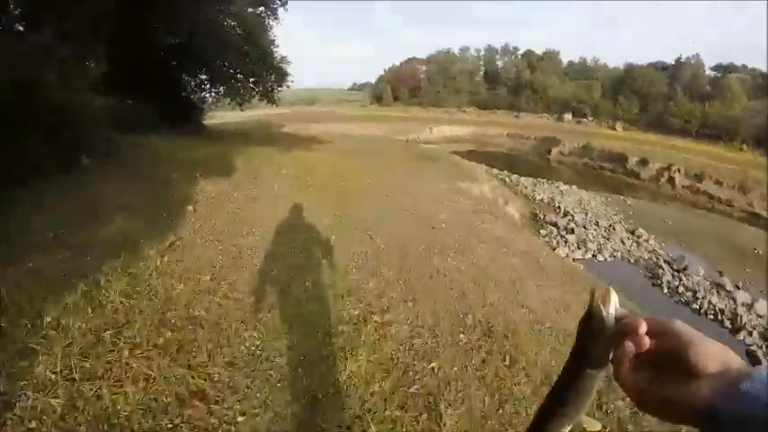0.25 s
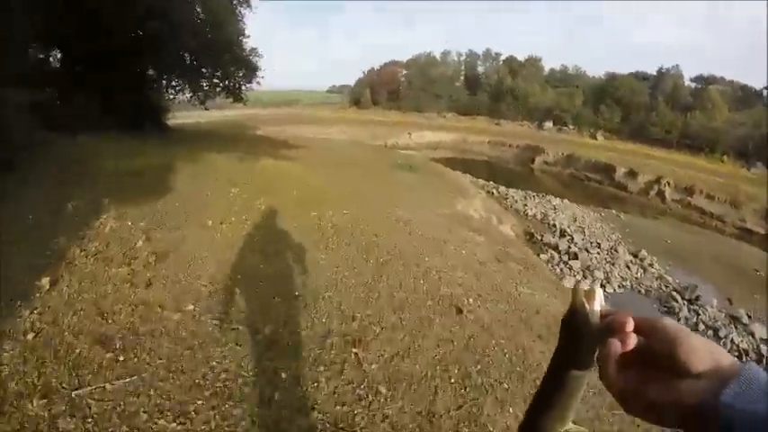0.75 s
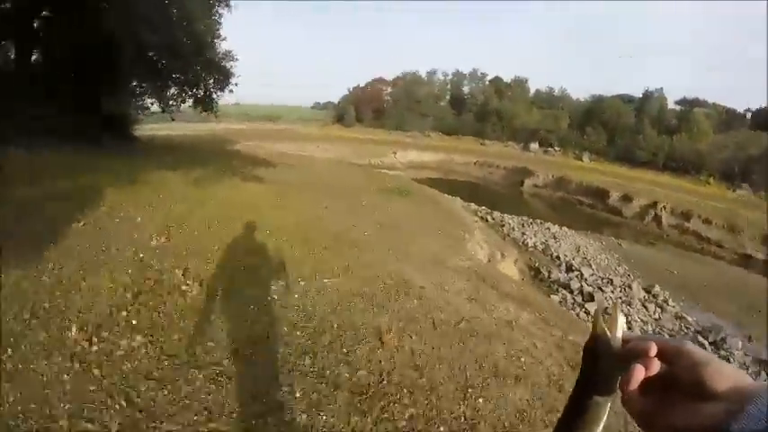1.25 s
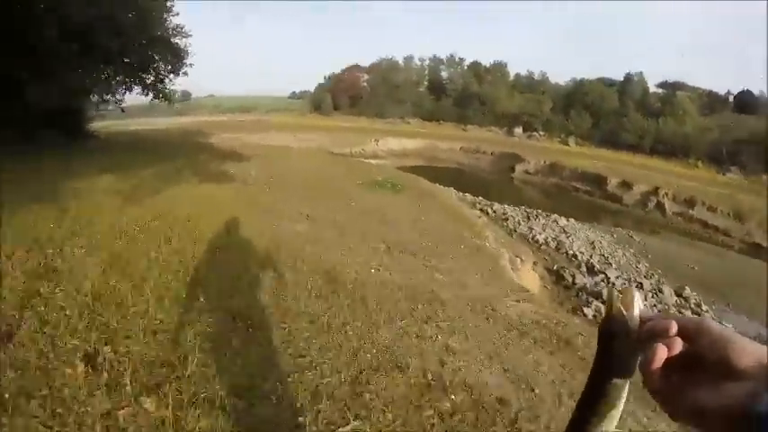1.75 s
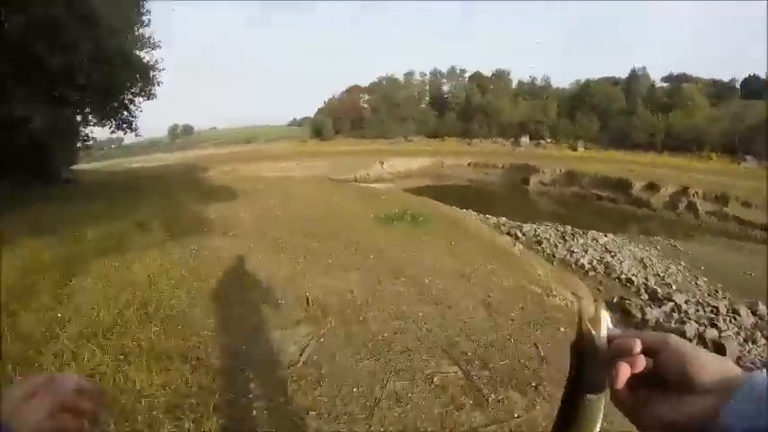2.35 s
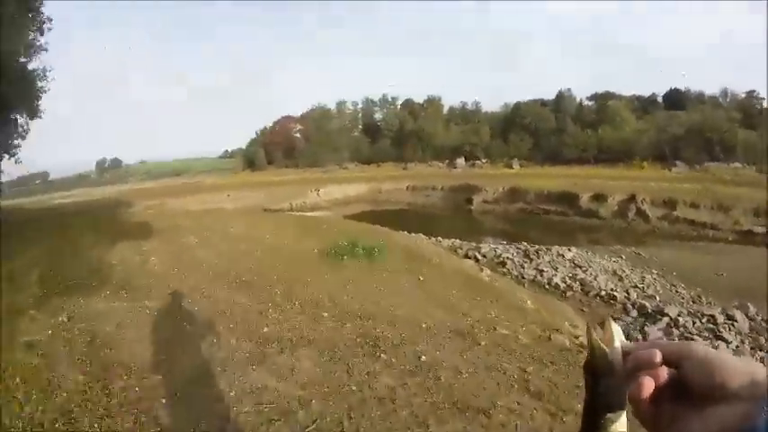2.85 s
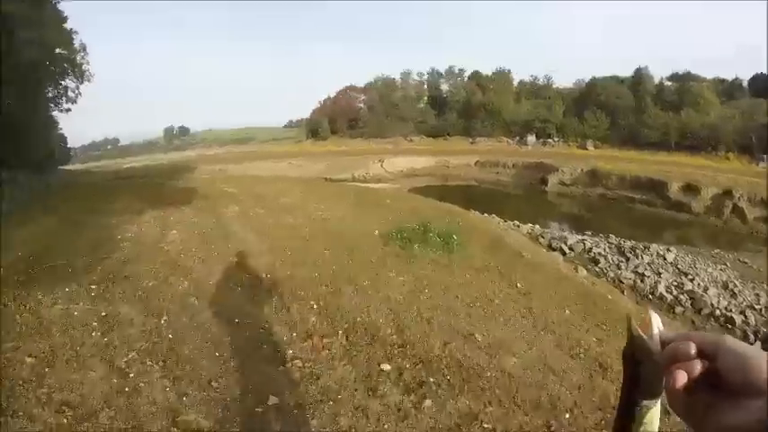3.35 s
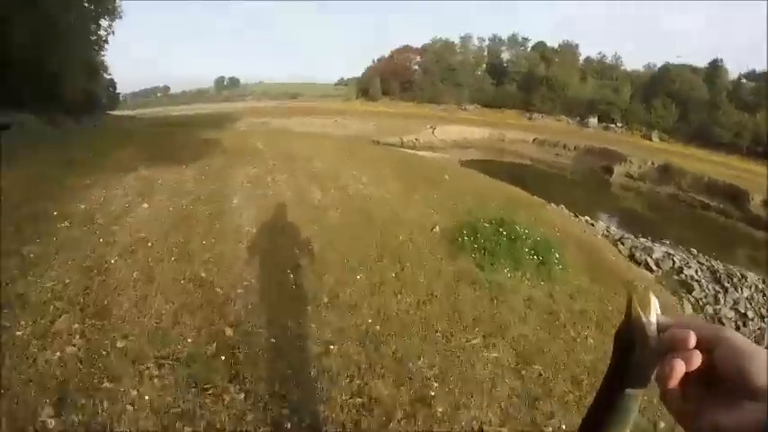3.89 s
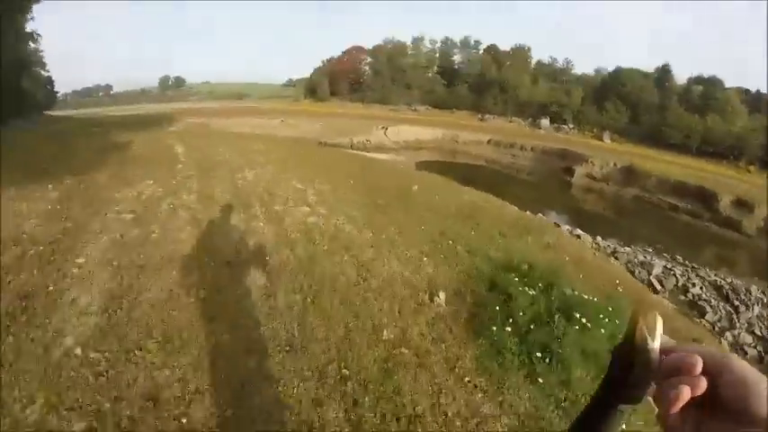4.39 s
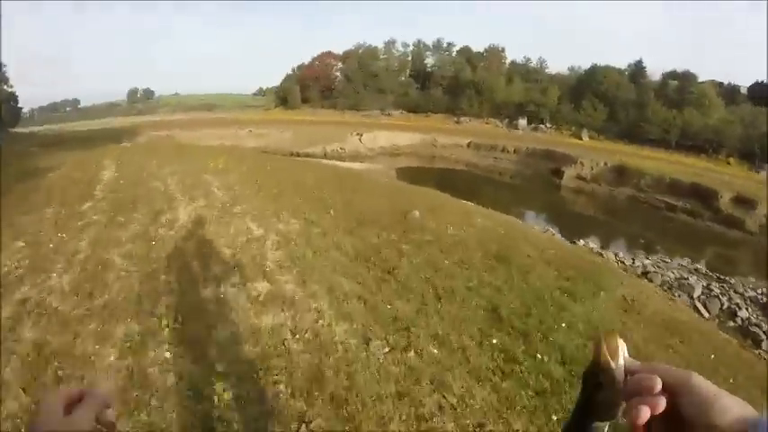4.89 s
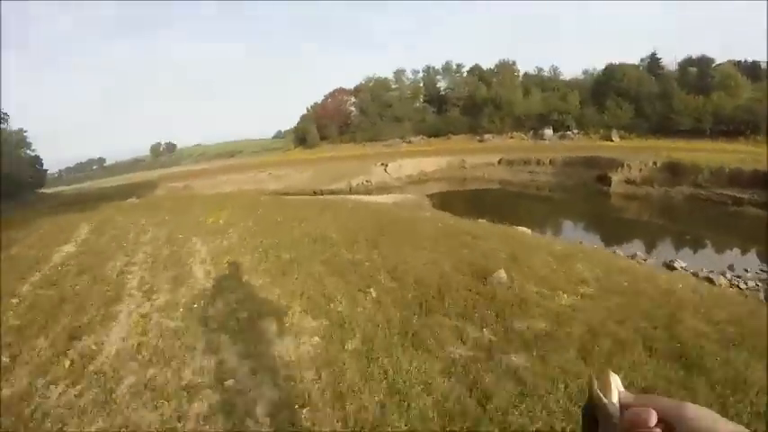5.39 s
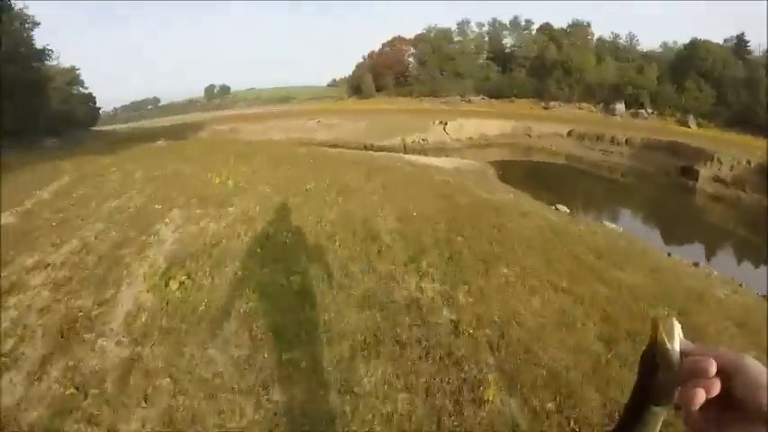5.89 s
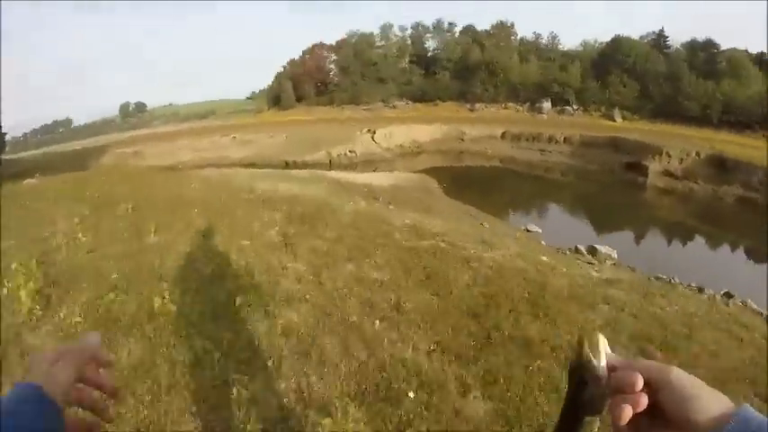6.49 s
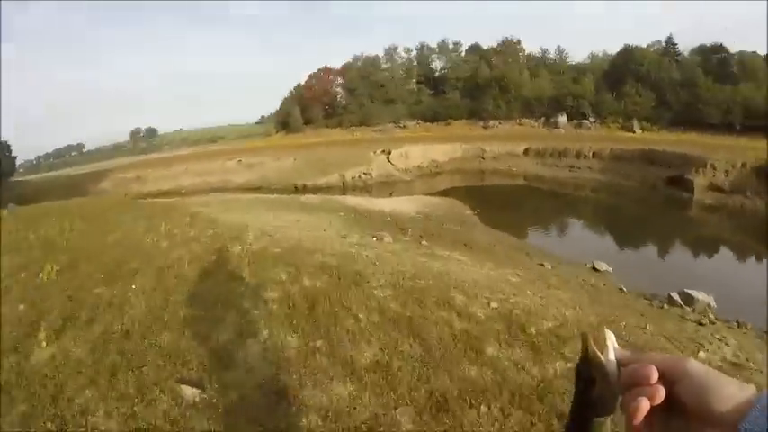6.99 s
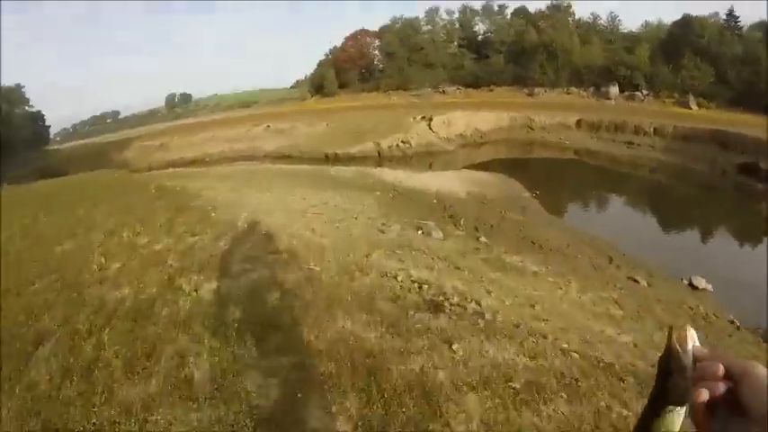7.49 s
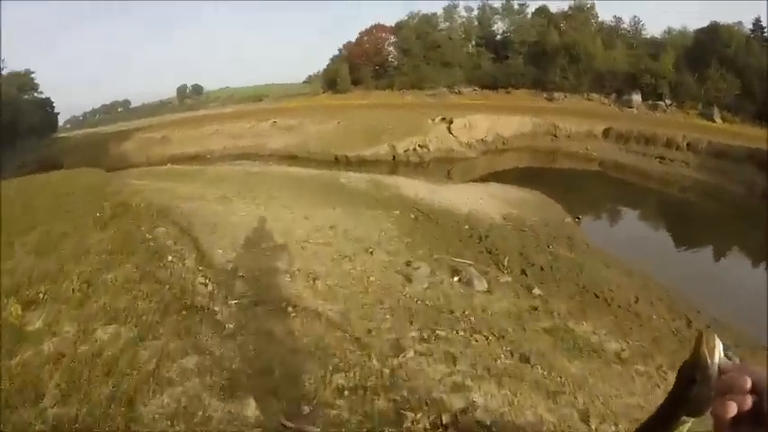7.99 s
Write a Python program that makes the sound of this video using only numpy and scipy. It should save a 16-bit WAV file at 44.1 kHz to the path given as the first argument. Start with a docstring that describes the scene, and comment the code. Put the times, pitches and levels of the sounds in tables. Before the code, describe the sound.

Close, muffled camera-mount thuds keep a quick walking rhythm over faint grassy rustling and hiss, with occasional hard clicks standing out.

```python
"""Dry grass: a walker crosses it with a small camera strapped on inside a closed housing.
Each stride jolts the mount: low pushes on the microphone are pressure pulses, dull knocks are frame modes
shaken by rough contacts. Grass and cloth rustle as noise and snaps through the housing rings; the strap rubs
as coloured noise. Short chatter makes sharp plastic clicks and dull fitting ticks.
A bird, a gliding narrow-band whistle, calls once, far off, over a steady hiss."""
import sys
import numpy as np
from scipy import signal
from scipy.fft import rfft, irfft
from scipy.io import wavfile
from scipy.ndimage import uniform_filter1d

SR = 44100
rng = np.random.default_rng(int(sys.argv[2]) if len(sys.argv) > 2 else 0)


def bounce(signal):
    """Save signal as a 16-bit WAV file at the path given by the first command-line argument."""
    frames = np.transpose(np.atleast_2d(signal))
    limited = np.clip(frames, -1, 1)
    pcm = np.round(limited * 32767).astype(np.int16)
    wavfile.write(sys.argv[1], SR, pcm)


N = 363825

# Jolts of the stride. Each row: crest in seconds, push level in dB, push width in ms, rustle level in dB.
JOLTS = [(0.018, -41, 18, -61.5), (0.219, -44, 22, -58), (0.428, -50, 14, -57), (0.682, -42.5, 9.1, -58),
         (0.903, -43.5, 6, -59.5), (0.948, -41.5, 6.9, -62.5), (1.142, -41, 14, -57.5),
         (1.405, -40.5, 17, -63.5), (1.607, -37, 8.7, -57.5), (1.847, -37, 7.8, -61.5),
         (2.034, -37, 14, -60.5), (2.257, -35, 30, -59), (2.472, -41, 7.2, -61.5), (2.722, -38, 7.5, -58.5),
         (2.937, -36, 11.7, -59), (3.167, -43.5, 32, -61.5), (3.223, -47.5, 10, -64),
         (3.403, -33.5, 8.5, -59), (3.626, -34, 8.3, -55.5), (3.836, -36, 9.9, -58.5),
         (4.078, -34.5, 7.4, -56.5), (4.266, -38.5, 9.3, -60.5), (4.478, -31, 7.7, -55),
         (4.662, -39, 8.4, -61.5), (4.89, -33, 8, -59.5), (5.077, -41.5, 25, -61.5),
         (5.301, -34.5, 11, -58.5), (5.489, -36, 7.6, -63), (5.704, -31.5, 12, -58),
         (5.892, -41.5, 7.6, -62), (6.071, -37, 11.4, -60), (6.253, -40.5, 6.6, -58),
         (6.456, -30, 7.7, -57.5), (6.648, -40.5, 8.5, -60.5), (6.86, -34.5, 8.8, -60.5),
         (7.058, -37, 8, -57.5), (7.284, -42, 9.8, -62.5), (7.496, -37, 14, -61), (7.72, -41, 9.6, -58),
         (7.943, -47, 18, -59), (8.16, -43.5, 17, -62), (8.189, -38, 28, -63)]
# Resonances of the housing around the microphone. Each row: centre in Hz, width in Hz, level in dB.
HOUSING_RINGS = [(2294, 1350, -5), (2960, 374, 4), (3753, 203, 6.5), (4510, 370, -4.5), (4980, 258, 3),
                 (5745, 1310, -5.5)]
# Upper housing resonances. Each row: centre in Hz, width in Hz, level in dB.
UPPER_RINGS = [(7300, 580, 3), (7880, 1300, -3), (10340, 840, -14.5), (12440, 1200, -13.5)]


def gain_of(db):
    """Amplitude factor of a level in dB."""
    return 10 ** (np.asarray(db) / 20)


def evened(x):
    """Scale to rms 1."""
    return x / np.sqrt(np.mean(x ** 2) + 1e-20)


def add(mix, start_s, sound):
    """Add a sound into the mix in place, cut at the end of the mix."""
    part = mix[max(round(start_s * SR), 0):][:len(sound)]
    part += sound[:len(part)]


def resonate(x, hz, width_hz):
    """Two-pole resonance with gain 1 near its centre."""
    radius = np.exp(-np.pi * width_hz / SR)
    angle = 2 * np.pi * hz / SR
    edge = (1 - radius ** 2) / 2
    return signal.lfilter([edge, 0, -edge], [1, -2 * radius * np.cos(angle), radius ** 2], x)


def coloured(spectrum):
    """Steady noise of a given spectrum, rms 1."""
    point_hz, point_db = np.transpose(spectrum)
    hz = np.fft.rfftfreq(N, 1 / SR)
    db = np.interp(np.log(hz + 1), np.log(point_hz + 1), point_db)
    return evened(irfft(rfft(rng.standard_normal(N)) * gain_of(db), N))


def flutter(ms):
    """Random wobble of rms 1: noise smoothed twice over ms."""
    span = round(ms * SR / 1000)
    return evened(uniform_filter1d(uniform_filter1d(rng.standard_normal(N), span), span))


def ring(x, modes, tilt_db_per_octave=0., drift_db=None):
    """Sum of resonances, neighbours of opposite sign; each may drift in level by itself."""
    out = 0
    for k, (hz, width_hz, db) in enumerate(modes):
        level_db = db + tilt_db_per_octave * np.log2(hz / 4000)
        if drift_db is not None:
            level_db = level_db + drift_db * flutter(14.0)
        out = out + (-1) ** k * gain_of(level_db) * resonate(x, hz, width_hz)
    return out


def chatter(count, length_ms, blow):
    """Short bursts of contact noise, each led by a single blow."""
    ms = np.arange(1500) * 1000 / SR
    bursts = rng.standard_normal((count, 1500)) * np.exp(-(ms / length_ms) ** 2)
    return bursts + (ms == 0) * blow * np.linalg.norm(bursts, axis=1, keepdims=True)


def pushes():
    """A flat pressure crest between a dip before it and a swing back, then a soft rebound."""
    dip, dip_lead_ms, dip_width_ratio = 0.45, 15.5, 1.31
    back, back_delay_ms, back_width_ms = 0.47, 11.9, 16.5
    rebound, rebound_ms, rebound_width_ms = 0.23, 48.5, 22.6  # the mount swings out once more
    squareness = 3.83
    ms = np.arange(-100, 100, 1000 / SR)

    def bell(at_ms, width_ms):
        """Flat-topped pulse; width at half height."""
        return 2. ** -(abs(2 * (ms - at_ms) / width_ms) ** squareness)

    def swing(at_ms, width_ms):
        """Dip, crest and swing back of the pressure."""
        before = dip * bell(at_ms - dip_lead_ms, dip_width_ratio * width_ms)
        after = back * bell(at_ms + width_ms / 2 + back_delay_ms, back_width_ms)
        return bell(at_ms, width_ms) - before - after

    out = np.zeros(N + SR)
    for crest_s, db, width_ms, _ in JOLTS:
        shape = swing(0, width_ms) + rebound * swing(rebound_ms + width_ms / 4, rebound_width_ms)
        add(out, crest_s + .1, gain_of(db) * shape)  # crest lands 0.2 s late, trimmed below
    return out[SR // 5:][:N]


def knocks():
    """A short rough contact shakes the frame, higher modes more briefly; the first blow adds a spike."""
    # Frame meets mount. Each row: time in seconds, main mode peak in dB before the padding,
    # main mode in Hz, upper mode in dB re main.
    knock_table = [(0.199, -50, 193, -3.5), (0.651, -52, 196, -1.5), (0.697, -45, 273, -5.5),
                   (0.934, -54, 172, -6.5), (1.113, -53.5, 196, -1.5), (1.161, -47.5, 255, -3.5),
                   (1.58, -53, 250, -1), (1.625, -47.5, 250, -4), (1.817, -53, 316, -1.5),
                   (1.85, -51.5, 274, -10), (1.986, -56, 250, 2), (2.052, -53.5, 245, -0.5),
                   (2.239, -45.5, 255, -6), (2.448, -53.5, 233, -10), (2.711, -49, 251, -7),
                   (2.893, -54, 208, -0.5), (2.9584, -46.5, 272, -4.5), (3.392, -47.5, 240, -6.5),
                   (3.614, -38.5, 220, -9.5), (3.735, -56, 174, 5), (3.832, -44.5, 210, -6.5),
                   (4.059, -35.5, 228, -14.5), (4.192, -53, 230, -5.5), (4.251, -49, 269, -10),
                   (4.463, -34, 209, -4.5), (4.665, -48.5, 304, 0.5), (4.865, -43, 217, -11.5),
                   (5.013, -50.5, 208, -3.5), (5.28, -32.5, 216, -6), (5.402, -53.5, 229, -1.5),
                   (5.488, -56.5, 183, -3), (5.602, -54.5, 229, -2.5), (5.684, -35.5, 227, -13),
                   (5.885, -50, 330, -1.5), (6.053, -36.5, 225, -16), (6.247, -48, 275, -1),
                   (6.442, -38.5, 230, -12), (6.579, -49.5, 220, -5.5), (6.65, -50.5, 278, -1),
                   (6.829, -45.5, 218, -8.5), (6.981, -52, 182, -1), (7.047, -47.5, 171, -5.5),
                   (7.438, -54.5, 265, -0.5), (7.513, -58, 306, -4), (7.733, -49.5, 164, -8),
                   (7.918, -48, 255, 2.5)]
    # Fixed thud and upper modes of the frame. Each row: frequency in Hz, nominal t60 in seconds.
    frame_modes = [(105, .05), (500, .03)]
    main_t60_s, thud_db = 0.028, -5.0
    contact_cycles, quicker, blow = 2.83, 0.46, 0.95  # contact span in cycles of the main mode
    spike_db, spike_sigma_ms, pad_hz = -6.0, .27, 603.0
    out, spikes = np.zeros(N), np.zeros(N)
    t = np.arange(6000) / SR
    spike = signal.windows.gaussian(200, spike_sigma_ms * 1e-3 * SR)
    for s, db, main_hz, upper_db in knock_table:
        grit = rng.standard_normal(6000)
        modes = [(main_hz, main_t60_s)] + list(frame_modes)
        for (hz, t60_s), level_db in zip(modes, [0, thud_db, upper_db]):
            span_s = contact_cycles / main_hz * (main_hz / hz) ** quicker
            contact = grit * t / span_s * np.exp(-t / (.5 * span_s))
            contact[60] -= blow * np.linalg.norm(contact)  # first blow
            mode = resonate(resonate(contact, hz, 3.07 / t60_s), hz, 2.94 / t60_s)
            add(out, s - .003, gain_of(db + level_db) * mode / abs(mode).max())
        add(spikes, s - .0015, -gain_of(db + upper_db + spike_db) * spike)
    padding = signal.butter(3, pad_hz, fs=SR, output="sos")  # keeps the modes dull
    return spikes + signal.sosfilt(padding, out)


def clicks():
    """A millisecond or two of loose plastic chatter rings the housing."""
    # Each row: start in seconds, main rings peak in dB, then re that: low rings in dB,
    # tilt in dB per octave (of the main rings; half on the upper), upper rings in dB, top rings in dB.
    click_table = [(0.4507, -48, -3, -8, -27, -36), (0.6785, -45.5, 1.5, -1, -27, -38),
                   (1.779, -44, -15, 4, -6, -36), (1.8198, -53, 4, -6, -27, -35),
                   (2.222, -45, -10, -10, -31, -40), (2.2732, -35, -4, -13, -32, -47),
                   (2.9247, -29.5, -4.5, -10, -26, -47), (3.2278, -42, 3, 2, -20, -43),
                   (3.3947, -45, -5.5, 6, -30, -39), (3.6223, -19, -10.5, -8, -9, -47),
                   (3.6505, -33, -20, 15, -10, -30), (3.8317, -42.5, -4.5, 2, -27, -35),
                   (4.0404, -34.5, -5.5, -3, -31, -43), (4.4776, -22, -17, 9, -16.5, -6),
                   (4.6355, -49, -9, -5, -29, -35), (5.221, -46, -8, -14, -34, -40),
                   (5.2759, -41.5, -15, -14, -21, -36), (5.6805, -48, -1, -6, -27, -8),
                   (5.861, -50.5, 3.5, -8, -27, -36), (6.0544, -44, -7, -7, -25, -35),
                   (6.454, -21.5, -10.5, 3, -20, -17), (6.8339, -46.5, -7, -16, -16, -35)]
    # Highest rings. Each row: centre in Hz, width in Hz, level in dB.
    top_rings = [(14100, 2600, 4), (12600, 710, -27)]
    out = np.zeros(N)
    bursts = chatter(len(click_table), length_ms=1.8, blow=1.28)
    for (s, db, low_db, tilt, upper_db, top_db), burst in zip(click_table, bursts):
        parts = [(ring(burst, HOUSING_RINGS[2:], tilt), 0),
                 (ring(burst, HOUSING_RINGS[:2]), low_db),
                 (ring(burst, UPPER_RINGS, 0.5 * tilt), upper_db),
                 (ring(burst, top_rings), top_db)]
        for part, level_db in parts:
            add(out, s, gain_of(db + level_db) * part / abs(part).max())
    return out


def ticks():
    """A brief contact of the strap fittings in one broad, dead resonance."""
    # Each row: start in seconds, peak in dB, centre in Hz.
    tick_table = [(0.656, -53, 902), (1.162, -57, 900), (1.414, -51, 2100), (2.271, -46, 2130),
                  (2.924, -62, 2090), (2.959, -47.5, 844), (3.227, -51, 937), (3.621, -43, 2240),
                  (3.65, -45.5, 1270), (3.745, -54.5, 1260), (3.836, -48, 703), (4.039, -48.5, 1330),
                  (4.381, -52.5, 1330), (4.457, -51, 1890), (4.475, -47, 751), (4.668, -47.5, 724),
                  (4.797, -56, 1300), (4.872, -47.5, 1060), (5.279, -47, 1700), (5.412, -48.5, 1540),
                  (5.604, -53, 1240), (5.684, -51, 800), (5.887, -49, 700), (6.19, -49, 1070),
                  (6.249, -54, 770), (6.453, -42.5, 1210), (6.654, -52, 929), (6.986, -47.5, 1790),
                  (7.442, -49, 1250), (7.918, -48, 1010)]
    width_hz = 840
    out = np.zeros(N)
    bursts = chatter(len(tick_table), length_ms=1.86, blow=0.31)
    for (s, db, hz), burst in zip(tick_table, bursts):
        tick = resonate(resonate(burst, hz, width_hz), hz, 2 * width_hz)
        add(out, s, gain_of(db) * tick / abs(tick).max())
    return out


def motion_db():
    """Level of the rustle: a peak at each jolt, a rounded swell for each swish, over a faint bed."""
    # A leg brushes through the grass between jolts. Each row: middle in seconds, level in dB,
    # length in seconds between the -6 dB points.
    swishes = [(0.318, -69.5, 0.19), (0.48, -61, 0.056), (0.577, -66.5, .08), (1.368, -61, 0.13),
               (1.49, -65.5, 0.07), (1.781, -62.5, 0.15), (1.942, -64.5, 0.049), (2.199, -62.5, 0.055),
               (2.3, -69, 0.089), (2.581, -65.5, 0.031), (2.796, -73, 0.14), (3.09, -64, 0.15),
               (3.28, -67, .1), (3.544, -65.5, 0.072), (3.69, -62.5, 0.15), (4.025, -59.5, 0.08),
               (4.11, -66, 0.055), (4.397, -62, 0.052), (4.567, -70, .07), (4.815, -62, 0.05),
               (5.013, -64.5, 0.076), (5.222, -63, 0.041), (5.417, -67.5, 0.11), (5.62, -63.5, 0.052),
               (5.816, -62, 0.039), (6, -61, 0.07), (6.372, -63.5, .07), (6.577, -66.5, 0.047),
               (6.775, -60, 0.043), (6.97, -66, 0.058), (7.223, -64, 0.1), (7.377, -73, .12),
               (7.645, -68, 0.061)]
    lead_s, bed_db = 0.002, -72
    rise_db_per_s, fall_db_per_s = 234, 226
    t = np.arange(0, N / SR + .002, .001)
    power = gain_of(bed_db) ** 2
    for crest_s, _, _, db in JOLTS:
        late_s = t - crest_s + lead_s
        drop_db = np.maximum(-rise_db_per_s * late_s, fall_db_per_s * late_s)
        power = power + gain_of(db - drop_db) ** 2
    for middle_s, db, length_s in swishes:
        power = power + gain_of(db - 6 * (2 * (t - middle_s) / length_s) ** 2) ** 2
    return np.interp(np.arange(N) / SR, t, 10 * np.log10(power))


def grass(level_db):
    """Grass and cloth: hiss and small snaps of stalks through the housing, following the motion."""
    snaps_per_s, snap_share, upper_db = 1100, 0.56, -12.0
    snap_gain = gain_of(4.2 * np.minimum(rng.exponential(1, N), 4))
    snaps = snap_gain * (rng.random(N) < snaps_per_s / SR) * rng.choice([-1, 1], N)
    hiss = rng.standard_normal(N) * gain_of(3.0 * flutter(3.))
    drive = hiss + snap_share * evened(snaps)
    main = ring(drive, HOUSING_RINGS, drift_db=1.3)
    upper = ring(drive, UPPER_RINGS, drift_db=0.2)
    return evened(main + gain_of(upper_db) * upper) * gain_of(level_db)


def strap(level_db):
    """The same motion drags the strap over the frame: coloured noise with a fluttering level."""
    # Each row: frequency in Hz, relative density in dB per Hz.
    rub_spectrum = [(15, 2), (40, -3.5), (120, -17), (250, -17.5), (520, -27.5), (800, -32.5), (1290, -32),
                    (2000, -43.5), (16000, -67)]
    rub_db = -57.5 + 0.89 * (level_db + 64.5) + 4.26 * flutter(10.5)
    return coloured(rub_spectrum) * gain_of(rub_db)


def rustle():
    """Grass and strap, driven by one motion."""
    level_db = motion_db()
    return grass(level_db) + strap(level_db)


def bird():
    """One thin, fuzzy whistle that rises a little: narrow noise on a gliding carrier."""
    # One row: level in dB, length in seconds between the -6 dB points, start in Hz, end in Hz, width in Hz.
    call = (-69, .1, 7150, 7400, 330)
    db, length_s, from_hz, to_hz, width_hz = call
    middle_s = 3.27
    u = (np.arange(N) / SR - middle_s) / length_s
    hz = from_hz + (to_hz - from_hz) * np.clip(u + .5, 0, 1)
    phase = 2 * np.pi * np.cumsum(hz) / SR
    lowpass = signal.butter(2, width_hz / 2, fs=SR)
    fuzz = signal.lfilter(*lowpass, rng.standard_normal((2, N)))
    whistle = evened(fuzz[0] * np.cos(phase) + fuzz[1] * np.sin(phase))
    return gain_of(db - 6 * (2 * u) ** 2) * whistle


def floor():
    """Air and microphone hiss: steady coloured noise."""
    # Each row: frequency in Hz, relative density in dB per Hz.
    floor_spectrum = [(12, -29), (22, -3.5), (45, -7), (120, -24), (250, -24.5), (520, -23), (700, -28.5),
                      (1900, -33), (4000, -37), (7000, -42), (16000, -49.5)]
    floor_db = -64
    return gain_of(floor_db) * coloured(floor_spectrum)


def scene():
    """Sum of all layers, one channel."""
    return (pushes() + knocks() + clicks() + rustle() + ticks() + bird() + floor())[None]


def record(dry):
    """The input stage drops the lowest bass; then the band limit."""
    bass_cut_hz, edge_hz = 8., 15800
    x = signal.lfilter(*signal.butter(1, bass_cut_hz, "high", fs=SR), dry)
    band_limit = signal.firwin(511, edge_hz, window=("kaiser", 9), fs=SR)
    return signal.oaconvolve(x, band_limit[None], "same")


dry = scene()
out = record(dry)
bounce(out)
```